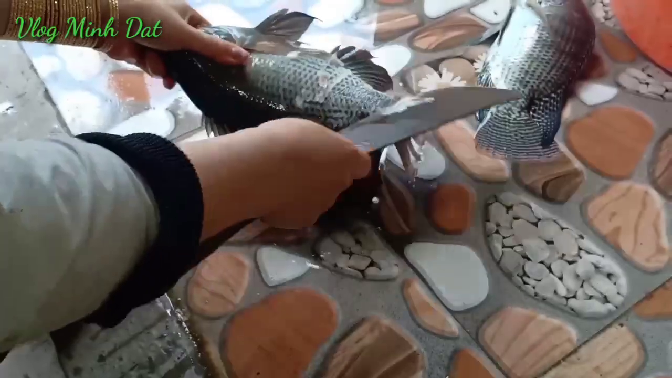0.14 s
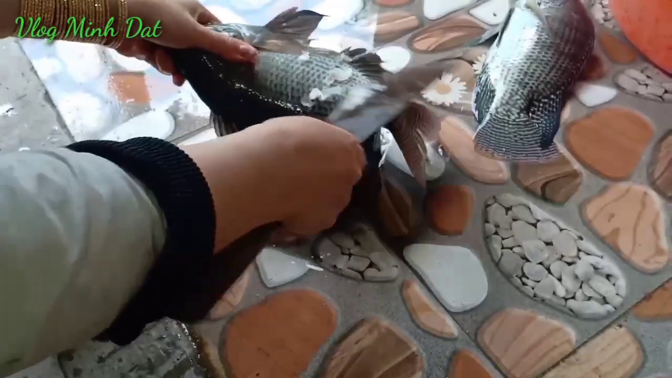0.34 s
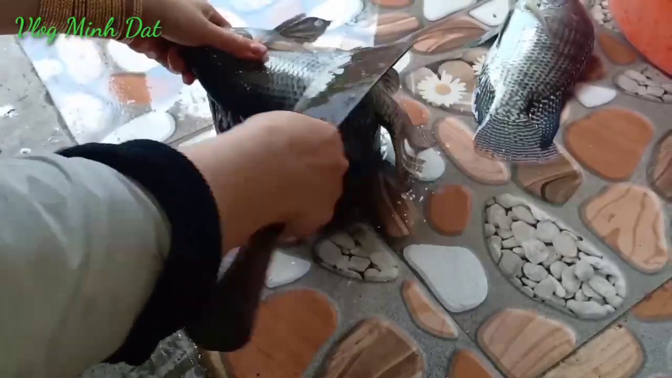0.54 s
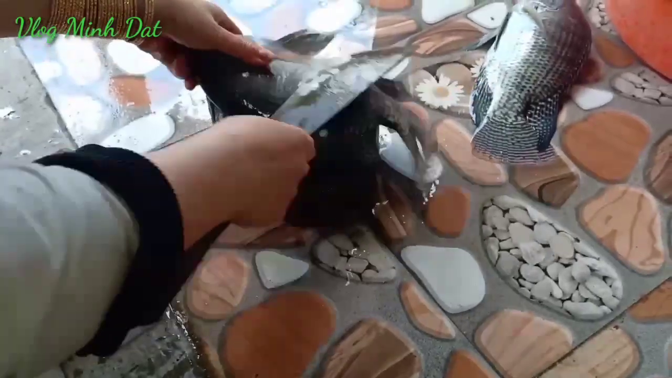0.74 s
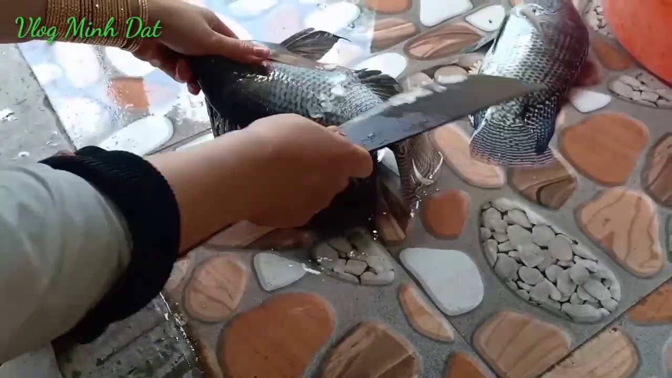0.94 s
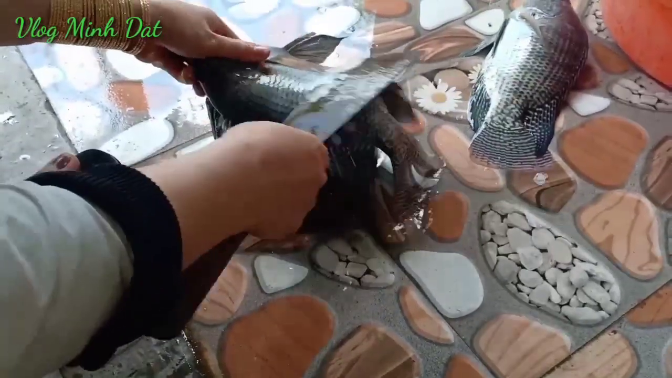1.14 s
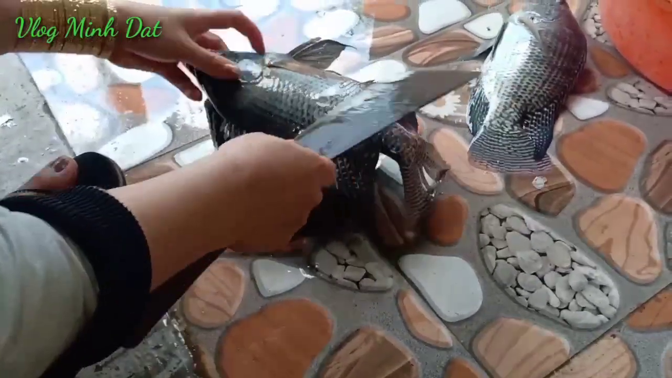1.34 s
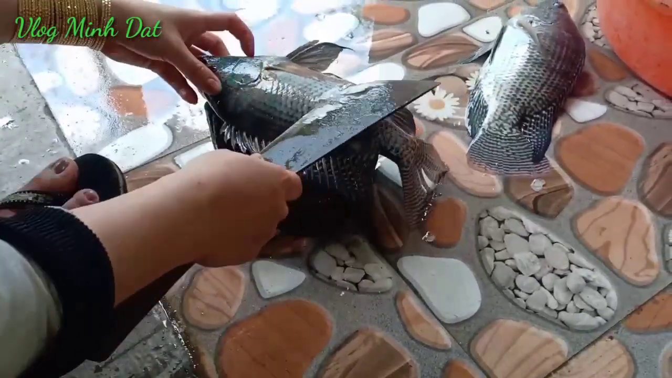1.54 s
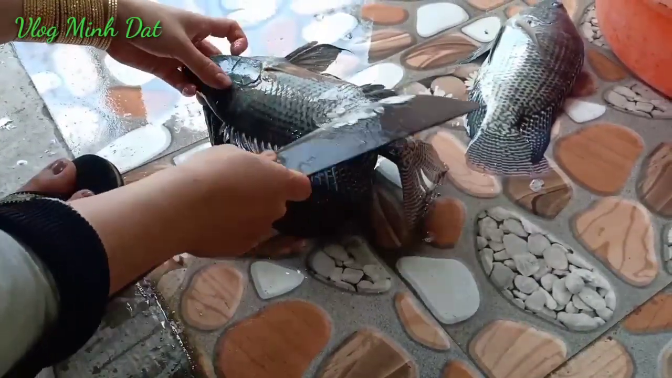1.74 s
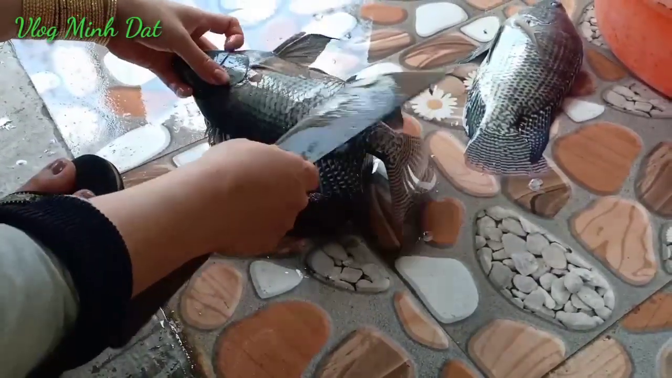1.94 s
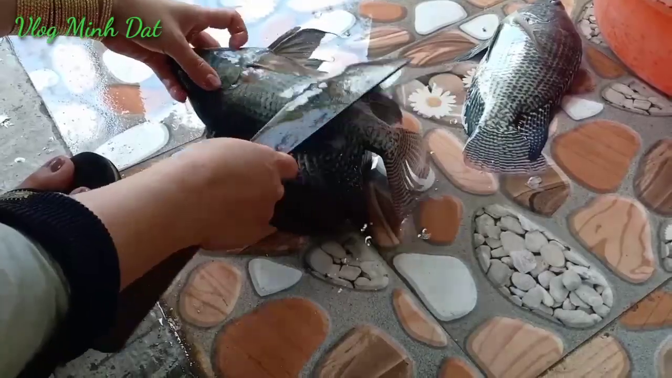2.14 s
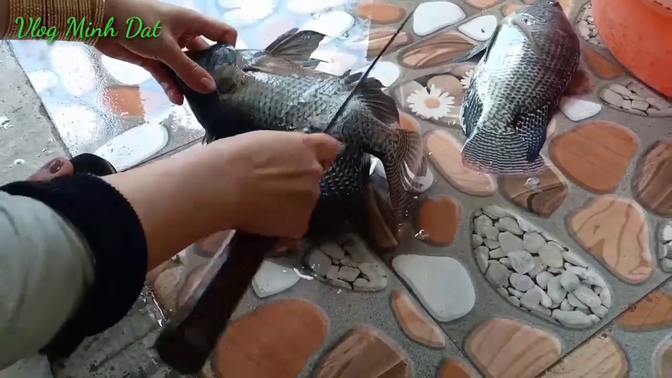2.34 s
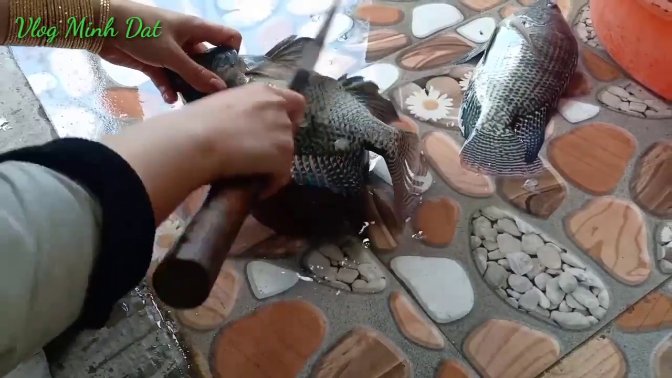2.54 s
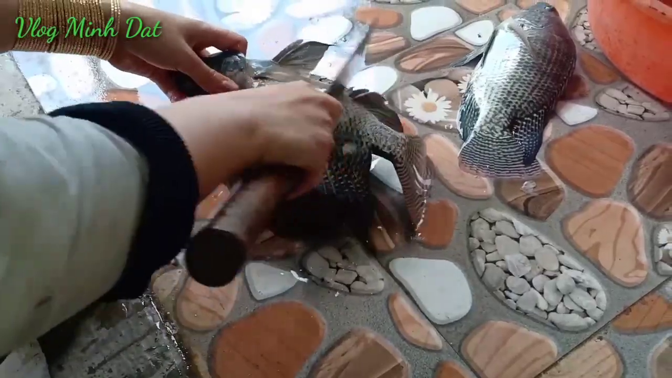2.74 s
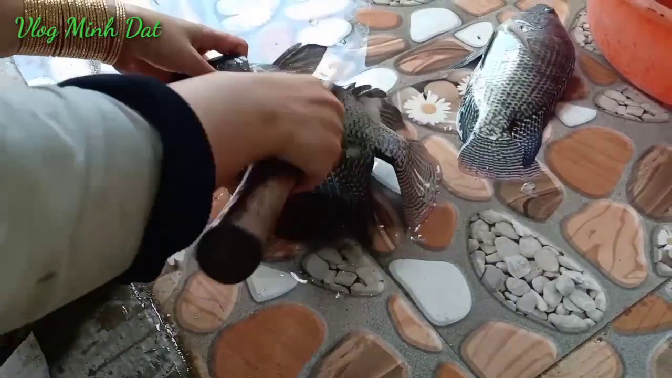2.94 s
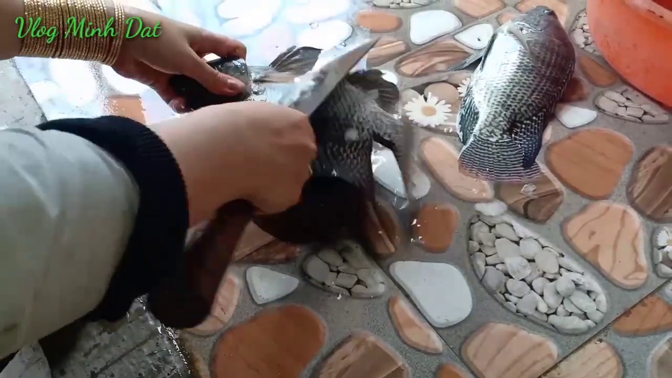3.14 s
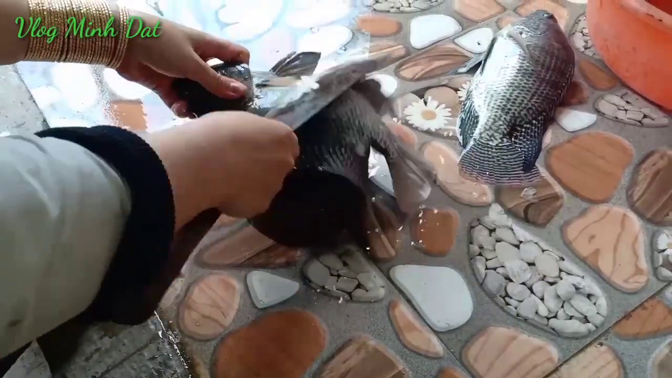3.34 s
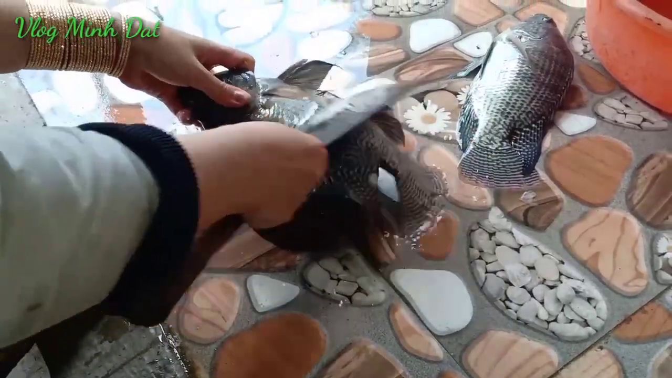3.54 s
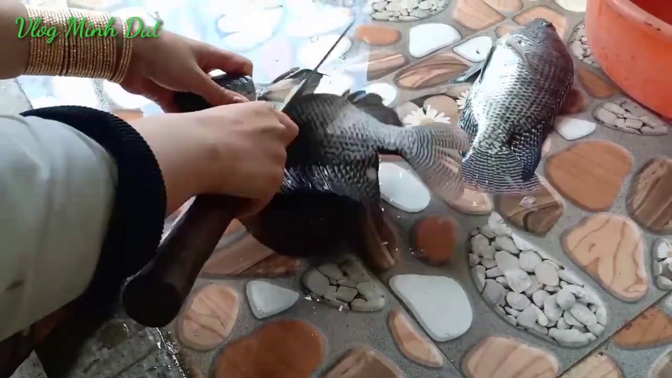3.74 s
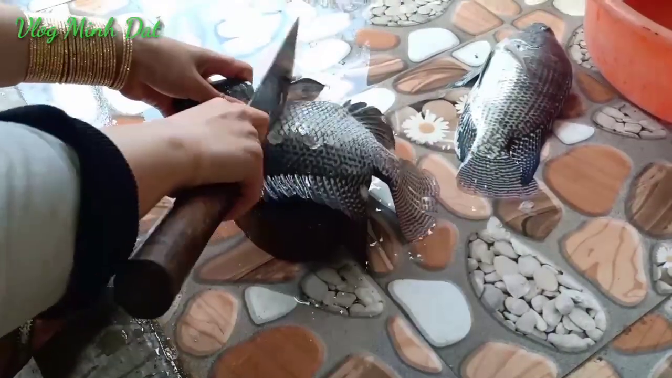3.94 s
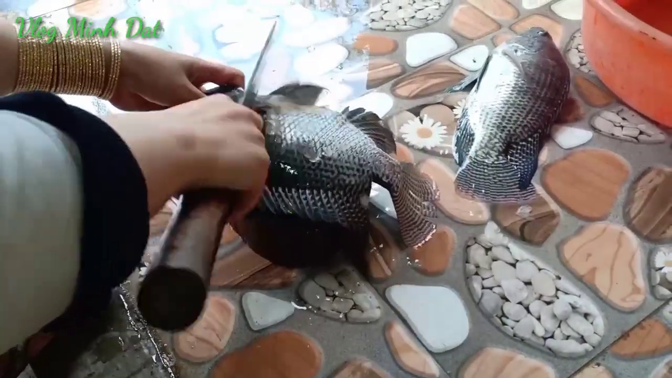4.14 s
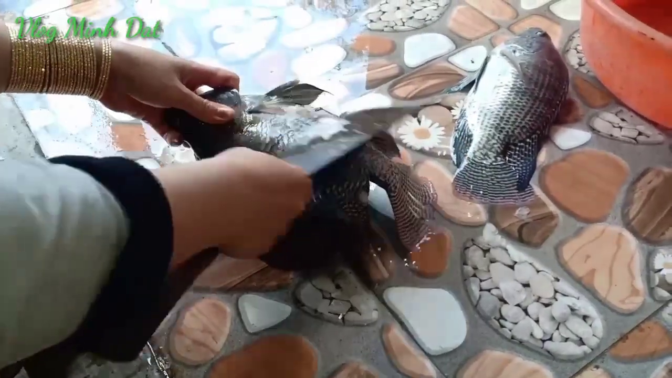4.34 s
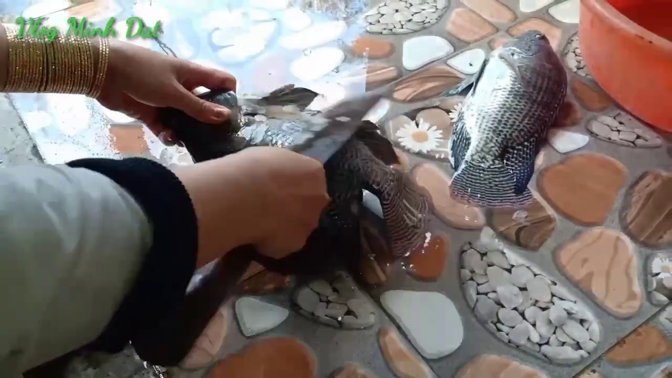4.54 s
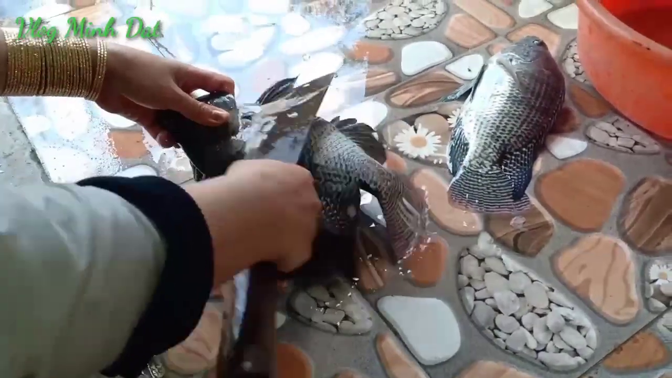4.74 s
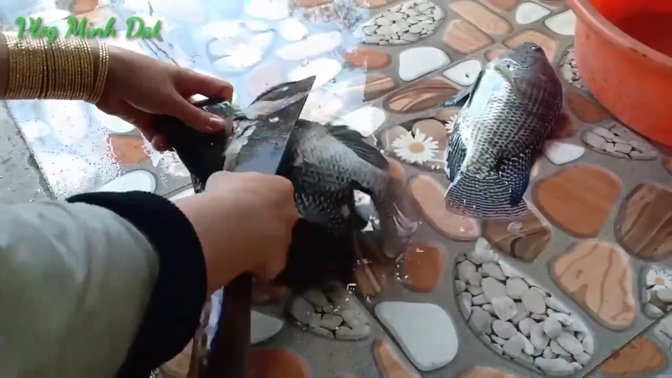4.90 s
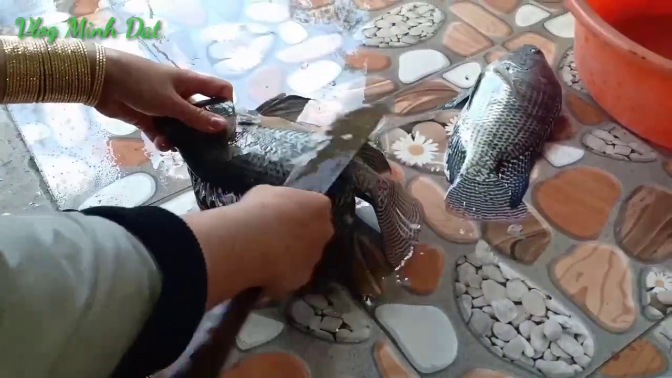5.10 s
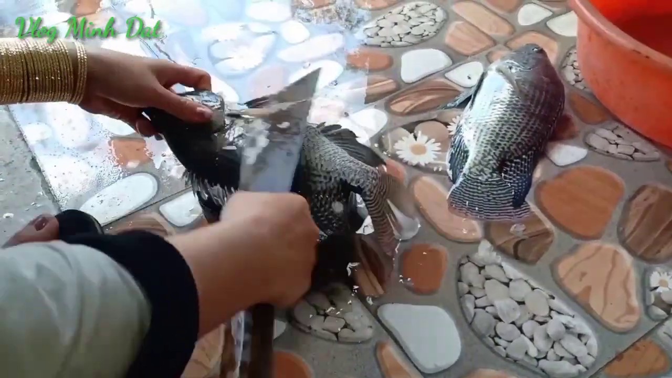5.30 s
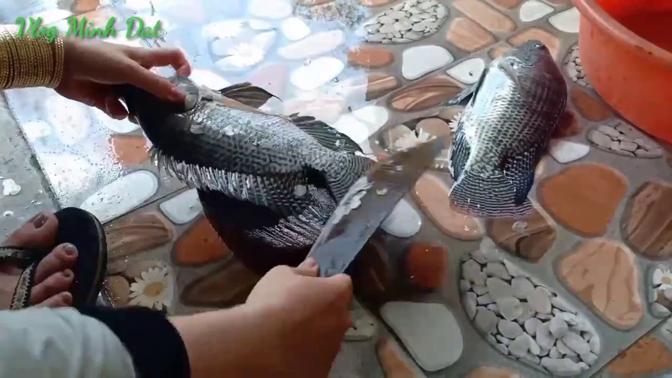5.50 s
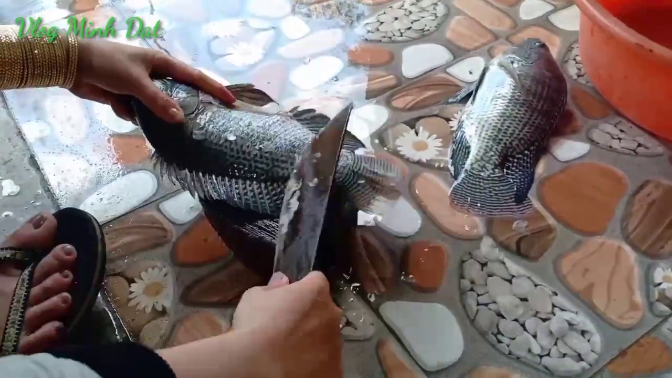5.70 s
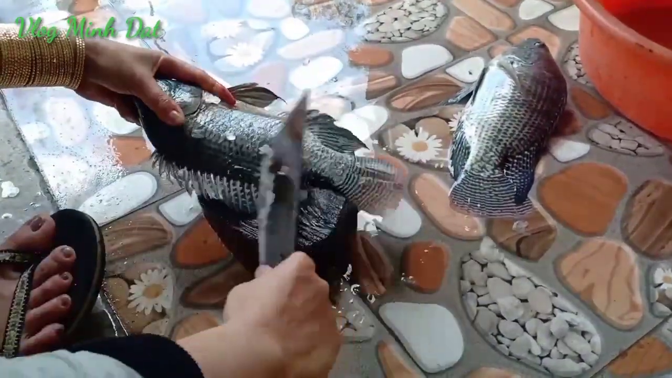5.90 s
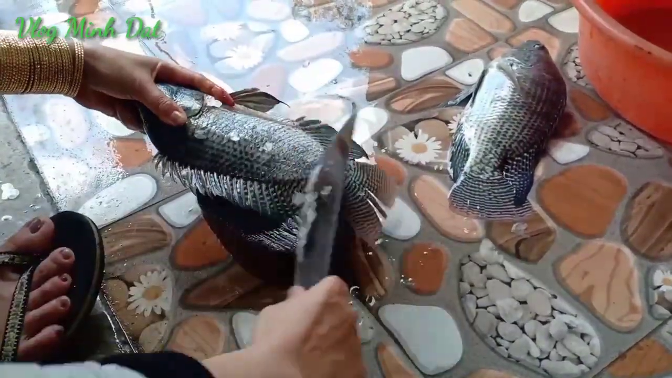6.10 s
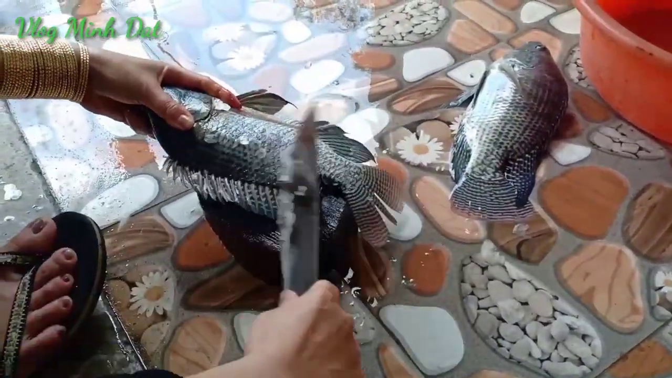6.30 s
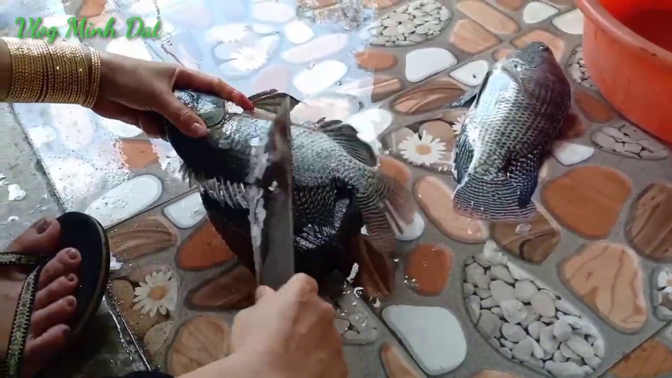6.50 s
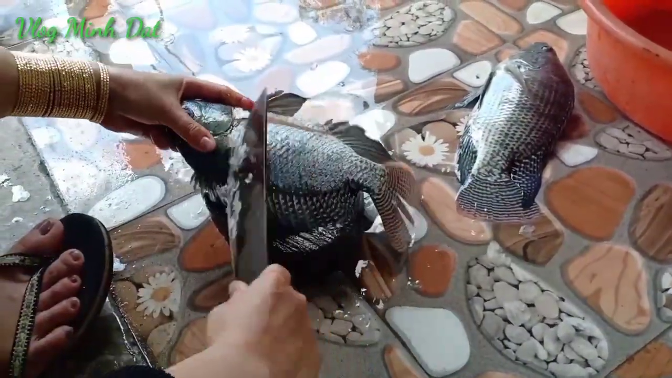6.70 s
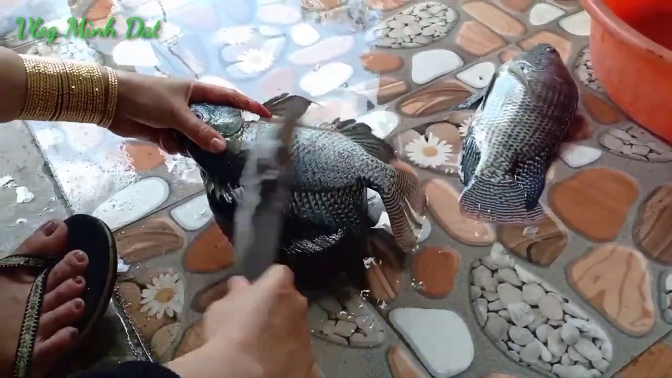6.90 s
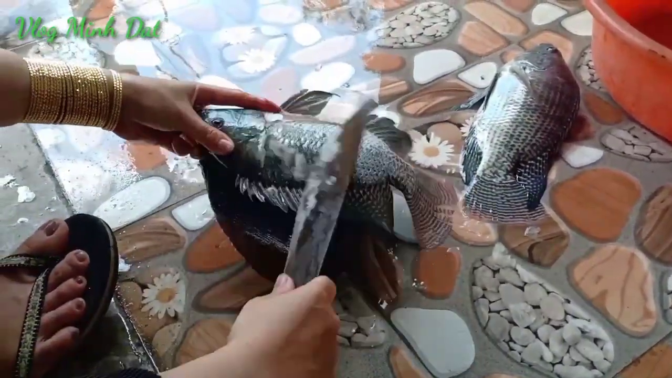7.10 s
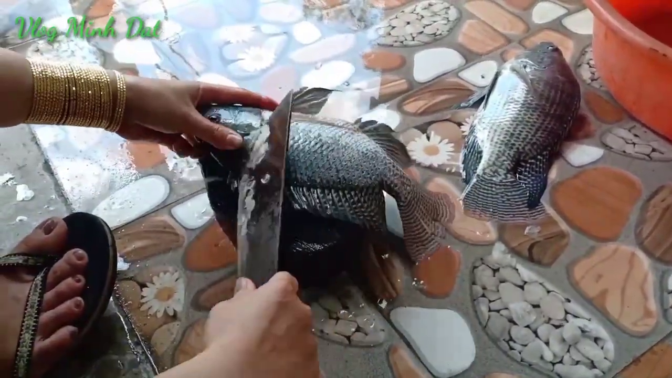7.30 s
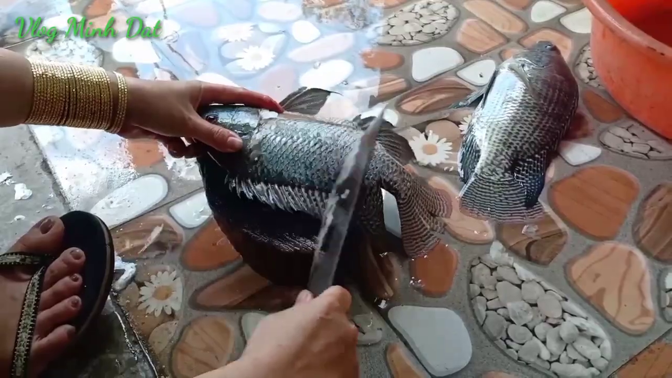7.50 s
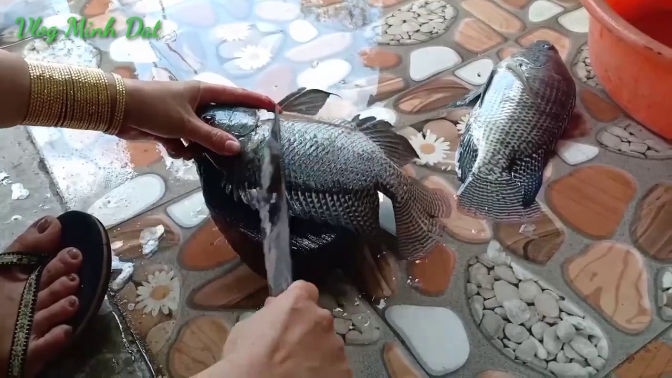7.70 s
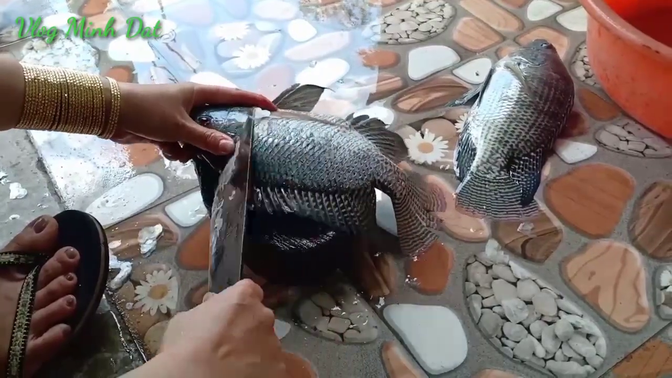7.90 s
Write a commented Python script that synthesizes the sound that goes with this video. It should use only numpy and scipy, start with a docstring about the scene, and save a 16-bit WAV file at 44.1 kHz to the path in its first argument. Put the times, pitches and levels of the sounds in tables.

```python
"""Rasping runs of scales tear off a wet fish under a large knife, three or four strokes a second on a tiled floor.
Each stroke drives random tearing bursts and a soft body thud; stiff scales snap and ring, the belly bumps the tiles.
In between, wet skin ticks, trapped air pops as short rising tones, and glancing passes ring the steel's modes.
Two close ports hear it in a small hard room, over quiet air noise and a faint hum."""
import sys
import numpy as np
from scipy import signal
from scipy.fft import rfft, irfft
from scipy.io import wavfile
from scipy.ndimage import uniform_filter1d, map_coordinates

SR = 44100
rng = np.random.default_rng(int(sys.argv[2]) if len(sys.argv) > 2 else 0)


def transcribe(signal):
    """Save signal, clipped to [-1, 1], as a 16-bit WAV file at the path in sys.argv[1]."""
    frames = np.atleast_2d(signal).T
    limited = np.clip(frames, -1, 1)
    pcm = np.round(limited * 32767).astype(np.int16)
    wavfile.write(sys.argv[1], SR, pcm)


N = 350595
TIME = np.arange(N) / SR  # seconds


def from_db(db):
    """Decibels to gain."""
    return 10 ** (np.asarray(db) / 20)


def rms_one(x):
    """Scale to rms 1."""
    return x / np.sqrt(np.mean(x ** 2) + 1e-20)


def at_hz(points, hz):
    """Read a table on a log-frequency axis."""
    known_hz, values = np.transpose(points)
    return np.interp(np.log(np.maximum(hz, 1)), np.log(known_hz), values)


def response(spectrum, size=2048):
    """Causal (minimum-phase) impulse response with the given spectrum."""
    spectrum_db = at_hz(spectrum, np.fft.rfftfreq(size, 1 / SR))
    cepstrum = irfft(np.log(from_db(spectrum_db)))
    # fold the cepstrum onto positive times to make the response causal
    cepstrum[1:size // 2] *= 2
    cepstrum[size // 2 + 1:] = 0
    return irfft(np.exp(rfft(cepstrum)))


def convolve(x, impulse):
    """Filter x, keeping its length."""
    return signal.fftconvolve(x, impulse)[:len(x)]


def colour(x, spectrum):
    """Shape a white excitation; a unit-energy filter keeps its expected power."""
    impulse = response(spectrum)
    return convolve(x, impulse / np.linalg.norm(impulse))


def brighten(x, treble_db, corner_hz=3900):
    """Treble shelf: a sharper contact is a brighter one."""
    highpass = signal.butter(4, corner_hz, "high", fs=SR, output="sos")
    highs = signal.sosfiltfilt(highpass, x)
    return x + (from_db(treble_db) - 1) * highs


def ring(x, hz, t60):
    """Damped resonance: a unit click sets a sine of starting height 1 ringing."""
    radius = from_db(-60 / (t60 * SR))
    angle = 2 * np.pi * hz / SR
    return signal.lfilter([0, np.sin(angle)], [1, -2 * radius * np.cos(angle), radius ** 2], x + 1e-18)


def add(out, s, hz, db, attack_s, decay_s, glide_per_s=0):
    """Mix in a short tone that swells and rings away; its pitch climbs by twice glide_per_s."""
    at = int(s * SR)
    t = np.arange(SR // 8) / SR
    envelope = np.exp(-t / decay_s) * (1 - np.exp(-t / attack_s))
    tone = envelope * np.sin(2 * np.pi * hz * t * (1 + glide_per_s * t))
    out[at:at + len(t)] += from_db(db) * tone[:N - at]


def swell(s, half_s):
    """A smooth rise and fall around a moment; height 1, down to 1/e at half_s either side."""
    return np.exp(-((TIME - s) / half_s) ** 2)


def crackle(per_s, spread_db, tear_s, friction):
    """Scales let go at random, each a tiny tearing burst of its own size, over smooth friction; rms 1."""
    sizes = from_db(spread_db * np.minimum(rng.exponential(1, N), 4))
    energy = (rng.random(N) < per_s / SR) * sizes ** 2
    # tear_s is the decay time of the power
    tearing = signal.lfilter([1], [1, -np.exp(-1 / (tear_s * SR))], energy + 1e-18)
    loudness = np.sqrt(tearing / tearing.mean() + friction ** 2)
    return rms_one(loudness * rng.standard_normal(N))


def steadied(x, size):
    """The hand keeps the mean force even over size samples, whatever single scales do."""
    return x / np.sqrt(np.maximum(uniform_filter1d(x ** 2, size), 1e-9))


# Faint background tones: pitch_hz, level_db (rms)
HUM_TONES = [(414, -80), (490, -76.5), (587, -75.5)]


def hum(t60=1.0):
    """Noise keeps narrow resonances sounding, so faint tones waver in the background."""
    out = np.zeros(N)
    for hz, level_db in HUM_TONES:
        out += from_db(level_db) * rms_one(ring(rng.standard_normal(N), hz, t60))
    return out


# Relative noise spectrum of the air: frequency_hz, density_db (per Hz)
AIR_SPECTRUM = [(20, -10), (50, 0), (100, 4.5), (240, -1.5), (500, 0.5), (800, -3), (1500, -7.5),
                (2500, -1.5), (3300, -12), (5300, -13), (8000, -28), (15000, -30)]


def ambience(level_db=-60, apart_hz=600):
    """Quiet household air, mostly alike at both ports in the bass, more unrelated in the treble."""
    mid, side = (colour(rng.standard_normal(N), AIR_SPECTRUM) for part in range(2))
    highs = signal.sosfilt(signal.butter(1, apart_hz, "high", fs=SR, output="sos"), side)
    side = highs + .3 * (side - highs)
    return from_db(level_db) * np.array([mid + side, mid - side]) / np.sqrt(2)


def scatter(x, t60=0.027, size=4096):
    """Quick echoes off nearby surfaces; hand and knife keep moving, so the pattern keeps changing."""
    t = np.arange(size) / SR
    window = np.sqrt(signal.get_window("hann", size))
    padded = np.pad(x, (size, size))
    out = np.zeros(len(padded) + size)
    # half-overlapping blocks, each with its own random echo pattern
    for at in range(0, N + size, size // 2):
        echoes = rng.standard_normal(size) * from_db(-60 * t / t60) * (t > .001)
        echoes /= np.linalg.norm(echoes)
        out[at:at + 2 * size - 1] += signal.fftconvolve(padded[at:at + size] * window, echoes)
    return out[size:size + N]


# How long the room takes to die away by 60 dB: frequency_hz, t60_s
ROOM_DECAY = [(150, 0.36), (700, 0.28), (2000, 0.18), (5000, 0.24), (13000, 0.23)]


def reflections(x, early_db=-2, late_db=-6.0):
    """One port's echoes: the quick scatter, then the room dying band by band."""
    t = np.arange(SR // 2) / SR
    edges = np.geomspace(60, 18000, 10)  # Hz
    late = np.zeros(len(t))
    for low, high in zip(edges, edges[1:]):
        bandpass = signal.butter(2, [low, high], "band", fs=SR, output="sos")
        band = signal.sosfilt(bandpass, rng.standard_normal(len(t)))
        late += band * from_db(-60 * t / at_hz(ROOM_DECAY, np.sqrt(low * high)))
    late /= np.linalg.norm(late)
    return from_db(early_db) * scatter(x) + from_db(late_db) * convolve(x, late)


# Tone of the right port against the left: frequency_hz, gain_db
RIGHT_PORT_TONE = [(200, 0), (700, -.5), (1300, -1.5), (1900, -5.5), (2400, -11.5), (3100, -11),
                   (4000, -2.5), (5100, 1.5), (6500, -1.5), (10000, -4.5), (15000, -4.5)]
MEAN_LEFT_LAG_S = .00009


def ports(x, shared_hz=480):
    """Two close ports: the left hears the direct sound later, and only the bass echoes are alike in both."""
    echoes = np.array([reflections(x) for port in range(2)])
    bass = signal.sosfiltfilt(signal.butter(2, shared_hz, fs=SR, output="sos"), echoes)
    # the point of contact drifts along the fish, and the lag with it
    place = rms_one(signal.resample(rng.standard_normal(64), N))
    lag = MEAN_LEFT_LAG_S * (1 + .3 * place)
    left = map_coordinates(x, [(TIME - lag) * SR], order=3) + echoes[0]
    right = x + echoes[1] - bass[1] + bass[0]
    return np.array([left, convolve(right, response(RIGHT_PORT_TONE))])


# Wet pops of air trapped under the fish: start_s, pitch_hz (at the start), level_db (before the envelope)
AIR_POPS = [(.068, 616, -38.5), (.226, 681, -36.5), (1.108, 645, -44), (1.365, 815, -53), (3.526, 746, -45),
            (4.97, 700, -37), (5.018, 628, -41), (5.4, 1010, -52)]


def pops(attack_s=.0002, decay_s=0.011, glide_per_s=2.3):
    """Each air pocket rings briefly, rising in pitch as it opens."""
    out = np.zeros(N)
    for s, hz, level_db in AIR_POPS:
        add(out, s, hz, level_db, attack_s, decay_s, glide_per_s)
    return out


# Resting contact of blade and fingers with the wet skin: time_s, level_db (before TOUCH_DB)
SKIN_TOUCH = [(0, -66.5), (0.9, -76.5), (1.62, -65), (2.1, -75), (2.27, -63.5), (2.75, -55), (3.05, -62),
              (3.5, -59), (3.75, -59.5), (4.05, -48), (4.3, -59), (5.45, -56.5), (5.56, -69), (5.62, -49),
              (5.95, -67.5), (6.55, -64), (7.4, -66), (7.6, -54.5)]
TOUCH_DB = 5
# return slide: delay after the stroke's hold, half length, level against the stroke
RETURN_AFTER_S, RETURN_HALF_S, RETURN_DB = 0.069, 0.092, -23
# lift: lead before the build-up, half length, dip in level
LIFT_BEFORE_S, LIFT_HALF_S, LIFT_DEPTH_DB = 0.018, 0.0066, 6


def skin_contact():
    """Resting touch plus a return slide after every stroke; both ease off as the blade lifts for the next."""
    contact = from_db(np.interp(TIME, *np.transpose(SKIN_TOUCH)) + TOUCH_DB)
    lift = np.zeros(N)
    for bite, length_s, build_s, level_db in SCALING_STROKES:
        slide = swell(bite + length_s + RETURN_AFTER_S, RETURN_HALF_S)
        contact += from_db(level_db + RETURN_DB) * slide
        lift += swell(bite - build_s - LIFT_BEFORE_S, LIFT_HALF_S)
    return contact * from_db(-LIFT_DEPTH_DB * lift)


def wet_skin():
    """Sparse sticky ticks as blade and fingers slide lightly over the fish."""
    sticking = crackle(per_s=78, spread_db=4.0, tear_s=0.0011, friction=0.73)
    ticks = steadied(colour(sticking, RASP_SPECTRUM), size=2800)
    return brighten(ticks, treble_db=-1.0) * skin_contact()


# Belly bumps on the tiles: start_s, pitch_hz, level_db (before the envelope)
BELLY_THUMPS = [(.24, 210, -38), (.498, 202, -35), (3.09, 283, -36), (3.336, 300, -39), (3.612, 248, -41.5),
                (4.434, 223, -35.5), (4.713, 225, -33.5), (4.972, 345, -31.5), (5.226, 335, -30.5)]


def thumps(attack_s=0.0041, decay_s=0.0081):
    """The soft body lands without a click and is damped within a few cycles."""
    out = np.zeros(N)
    for s, hz, level_db in BELLY_THUMPS:
        add(out, s, hz, level_db, attack_s, decay_s)
    return out


# The edge glances along the scales without biting and the steel sings:
# centre_s, half_length_s, scrape_db (before the treble shelf), treble_db, ring_drive_db, part of the blade
BLADE_GLANCES = [(2.348, 0.034, -44.5, 4.5, -37, "tip"), (3.807, 0.056, -38, -5, -60, "middle"),
                 (5.729, .014, -38.5, 8, -32, "middle"), (5.84, 0.016, -43.5, 9.5, -33, "middle"),
                 (7.524, 0.046, -43.5, -12, -32, "heel"), (7.626, 0.0037, -37, -1, -22, "middle"),
                 (7.82, 0.015, -39, -20.5, -33, "heel")]
# Blade modes and how strongly each part excites them: pitch_hz, tip_db, middle_db, heel_db
BLADE_MODES = [(2070, -12, -14, 0), (3472, -16, -3, -22), (3860, -12, -2, -17), (4398, -16, -2, -14),
               (4845, 0, -16, -24), (5604, 1, 1, -15), (6830, -12, -5, -24), (7570, -11, -7, -26)]


def blade():
    """A glancing pass scrapes lightly and rings the steel: the contact picks the modes, the grip damps them."""
    parts = ["tip", "middle", "heel"]
    scales = torn_scales()
    scrape, steel = np.zeros((2, N))
    rubs = np.zeros((len(parts), N))
    for s, half_s, scrape_db, treble_db, ring_db, part in BLADE_GLANCES:
        touch = swell(s, half_s) + 1e-9
        scrape += from_db(scrape_db) * brighten(scales * touch, treble_db)
        rubs[parts.index(part)] += from_db(ring_db) * touch
    rubs *= steadied(crackle(per_s=300, spread_db=5.0, tear_s=0.00041, friction=0.3), size=900)
    for hz, *part_db in BLADE_MODES:
        # the grip damps the lowest bending mode most
        t60 = .075 * min(hz / 4500, 1) ** 2
        steel += ring(from_db(part_db) @ rubs, hz, t60) / np.sqrt(t60 * SR)
    return scrape + steel


# Stiff scales and fin spines snapping off the edge:
# start_s, crack_db (before the treble shelf), treble_db, ring_db (before the envelope), ring_hz
SCALE_SNAPS = [(.067, -28, 1.5, -24, 2090), (.087, -33.5, -2, -25.5, 2230), (.554, -33.5, 6, -36, 2260),
               (.783, -14.5, 2, -7.5, 2370), (.817, -24, -0.5, -17, 2080), (1.074, -23, 6, -21, 2200),
               (1.106, -16, -3.5, -15, 2420), (1.934, -31, -6, -37, 2500), (2.279, -27.5, -2, -28.5, 1530),
               (2.533, -35, 10, -23, 1850), (2.823, -14, 0, -12.5, 2410), (3.244, -23.5, -14, -14, 2194),
               (3.362, -28, 16.5, -16, 2700), (3.525, -22, -11, -31, 1970), (3.698, -25, 14.5, -19, 2340),
               (4.019, -21, -22, -19.5, 2680), (4.076, -27, -4.5, -27, 2380), (4.142, -28, 8.5, -24, 2880),
               (4.195, -9.5, -7.5, -14, 2610), (4.44, -22, 6, -12.5, 2500), (4.454, -14.5, 4.5, -13, 2330),
               (4.683, -17, -12, -10, 2240), (4.719, -20, -1, -13, 2290), (4.951, -19.5, -3, -11.5, 2530),
               (4.97, -20, -6, -18.5, 2250), (5.199, -14, 3, -11, 2360), (5.231, -19, -1, -12, 1925),
               (5.704, -32.5, 7, -24.5, 2170), (6.189, -29, 15.5, -28, 3000), (6.431, -37.5, -4, -29, 2150),
               (6.764, -27, 11, -37, 2130), (7.07, -35.5, 7.5, -24.5, 2440), (7.479, -32, 6, -25, 2060),
               (7.631, -17.5, -4, -4.5, 2110), (7.659, -23, 4.5, -17, 2210), (7.892, -12, -6.5, -9, 2060),
               (7.935, -21, 0, -17, 2460)]
# Relative spectrum of a crack: frequency_hz, density_db (per Hz)
SNAP_SPECTRUM = [(150, -38), (400, -25.5), (750, -13.5), (1350, -15.5), (1800, -0.5), (2900, -1),
                 (3900, -12), (5200, -9.5), (7500, -18.5), (10000, -24.5), (14500, -21.5)]


def snaps(rise_s=.0005, decay_s=0.0011, ring_decay_s=0.0028, size=2048):
    """A stiff scale bends, cracks off within a couple of milliseconds and rings at its own pitch."""
    out = np.zeros(N)
    lead = size // 8  # samples before the crack's peak
    t = (np.arange(size) - lead) / SR
    shape = np.exp(np.minimum(t / rise_s, -t / decay_s))
    for s, crack_db, treble_db, ring_db, hz in SCALE_SNAPS:
        crack = colour(shape * rng.standard_normal(size), SNAP_SPECTRUM)
        # every crack has the energy of its envelope before level and treble
        crack *= np.linalg.norm(shape) / np.linalg.norm(crack)
        at = int(s * SR) - lead
        out[at:at + size] += from_db(crack_db) * brighten(crack, treble_db)[:N - at]
        add(out, s - rise_s, hz, ring_db, rise_s, ring_decay_s)
    return out


# Relative spectrum of tearing scales, also of the skin ticks: frequency_hz, density_db (per Hz)
RASP_SPECTRUM = [(150, -37.5), (450, -22), (700, -18), (1100, -24), (1450, -16), (1850, -6), (2250, 0.5),
                 (2900, -4.5), (3900, -12), (5200, -10.5), (7500, -19.5), (10000, -25.5), (14500, -20.5)]


def torn_scales():
    """The edge ripping through rows of scales at an even force; rms about 1."""
    tearing = crackle(per_s=710, spread_db=4.5, tear_s=0.00082, friction=0.64)
    return steadied(colour(tearing, RASP_SPECTRUM), size=900)


def pressure(bite, release, build_s, fall_s):
    """Force of one stroke: builds, holds, falls; tenfold per build or fall time."""
    before = np.maximum(bite - TIME, 0) / build_s
    after = np.maximum(TIME - release, 0) / fall_s
    return from_db(-20 * np.minimum(before + after, 10))


# Scaling strokes: bite_s, full_force_s (hold length), build_s, force_db (before the rasp and thud levels)
SCALING_STROKES = [(0.063, 0.015, 0.0095, -54), (0.221, 0.028, 0.011, -42), (0.339, 0.0086, 0.025, -54.5),
                   (0.479, 0.017, .0022, -37.5), (.54, 0.014, .008, -55.5), (0.775, 0.0053, 0.0019, -28.5),
                   (1.07, 0.0057, 0.0022, -32.5), (1.86, 0.032, .003, -46.5),
                   (2.198, 0.0094, 0.0066, -48.5), (2.524, 0.084, 0.0072, -42.5),
                   (2.808, 0.057, 0.0092, -44.5), (3.067, 0.058, 0.0023, -44),
                   (3.355, 0.0027, 0.025, -36.5), (3.603, 0.028, 0.023, -43), (4.193, 0.018, 0.017, -36),
                   (4.428, 0.027, 0.021, -34.5), (4.684, 0.034, 0.013, -35), (4.949, 0.02, 0.018, -39.5),
                   (5.187, 0.049, 0.0028, -40.5), (5.941, 0.035, 0.043, -37.5),
                   (6.179, 0.075, 0.0081, -41.5), (6.477, 0.0029, 0.037, -35), (6.721, 0.043, .029, -38.5),
                   (6.994, 0.013, 0.028, -32), (7.284, 0.0039, 0.056, -38.5), (7.627, 0.056, 0.0061, -45),
                   (7.888, 0.047, 0.011, -43)]
# How the fish answers as it is turned and the knife moves along it:
# time_s, thud_db (on top of THUD_DB), top_treble_db (of the rasp)
FISH_ANSWER = [(.2, -8, 1.5), (1.0, -1.5, -4.5), (2.6, -12, -1), (3.5, -3.5, -0.5), (4.5, -13.5, -1.5),
               (5.1, -7.5, 1.5), (6.0, -17.5, 0.5), (7.1, -12.5, 0.5), (7.9, -8, -2)]
# Relative spectrum of the body shoved on the tiles: frequency_hz, density_db (per Hz)
THUD_SPECTRUM = [(30, -40), (80, -13.5), (160, -16.5), (205, -0.5), (245, -5.5), (340, -2.5), (410, -13.5),
                 (680, -3.5), (1000, -17), (1600, -23), (4000, -76)]
RASP_DB, RASP_FALL_S, TOP_TREBLE_HZ = 7, 0.026, 7350
THUD_DB, THUD_FALL_S, THUD_BUILD_RATIO = -2, 0.019, 1.7


def strokes():
    """One force tears the scales and shoves the soft body, which starts to slide a little earlier."""
    force, shove = np.zeros((2, N))
    for bite, length_s, build_s, level_db in SCALING_STROKES:
        release = bite + length_s
        force += from_db(level_db) * pressure(bite, release, build_s, RASP_FALL_S)
        shove += from_db(level_db) * pressure(bite, release, THUD_BUILD_RATIO * build_s, THUD_FALL_S)
    s, *columns = np.transpose(FISH_ANSWER)
    thud_db, top_db = (np.interp(TIME, s, column) for column in columns)
    rasp = brighten(torn_scales() * force, top_db, TOP_TREBLE_HZ)
    thud = steadied(colour(rng.standard_normal(N), THUD_SPECTRUM), size=700) * shove
    return from_db(RASP_DB) * rasp + from_db(THUD_DB + thud_db) * thud


def scene():
    """All contact sounds reach the two ports through one room; air and hum lie underneath."""
    work = pops() + wet_skin() + thumps() + blade() + snaps() + strokes()
    return ports(work) + ambience() + hum()


def record(dry):
    """The top is cut steeply above 15.9 kHz."""
    return signal.sosfilt(signal.ellip(10, .3, 70, 15900, fs=SR, output="sos"), dry)


dry = scene()
out = record(dry)
transcribe(out)
```